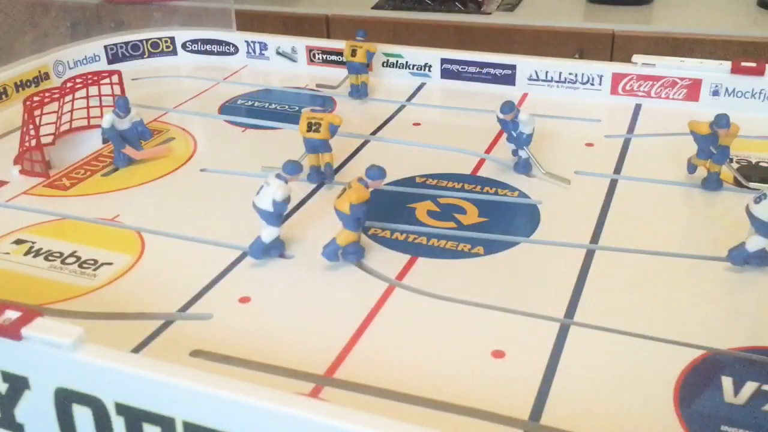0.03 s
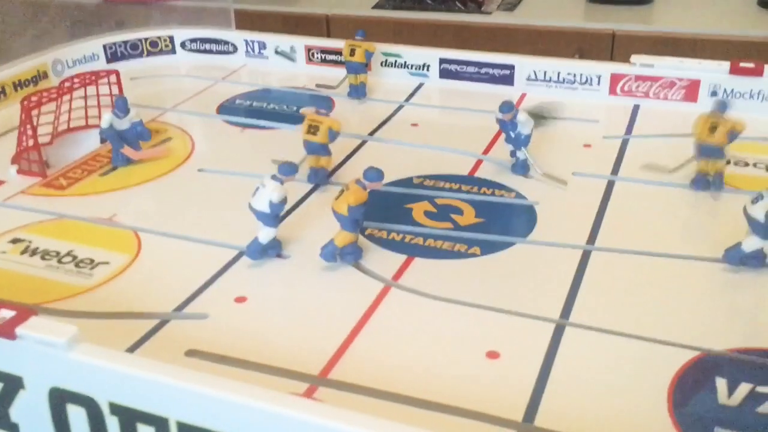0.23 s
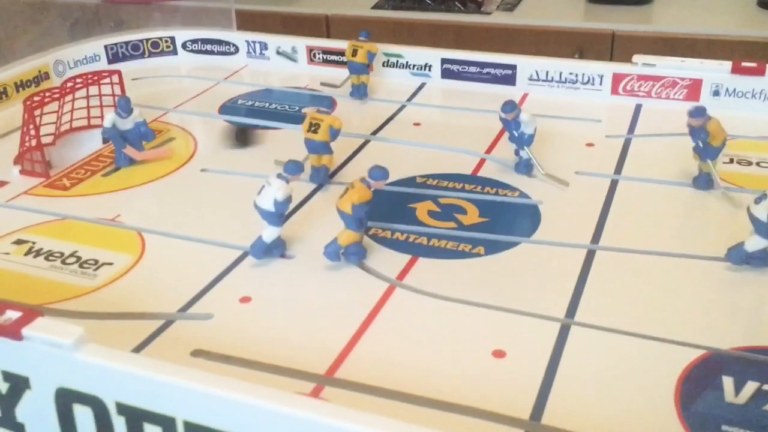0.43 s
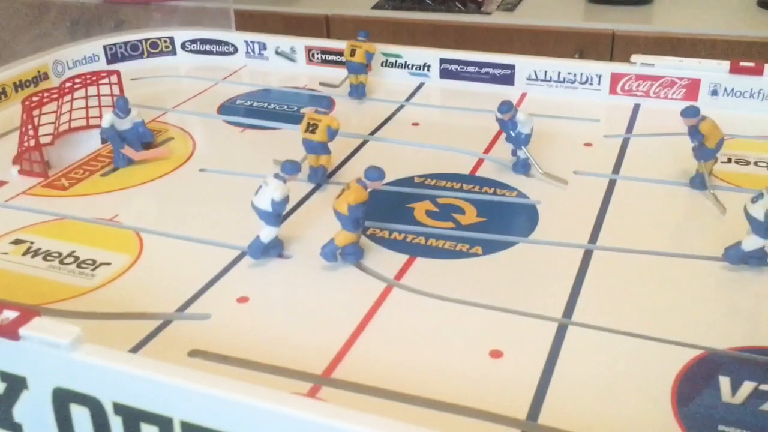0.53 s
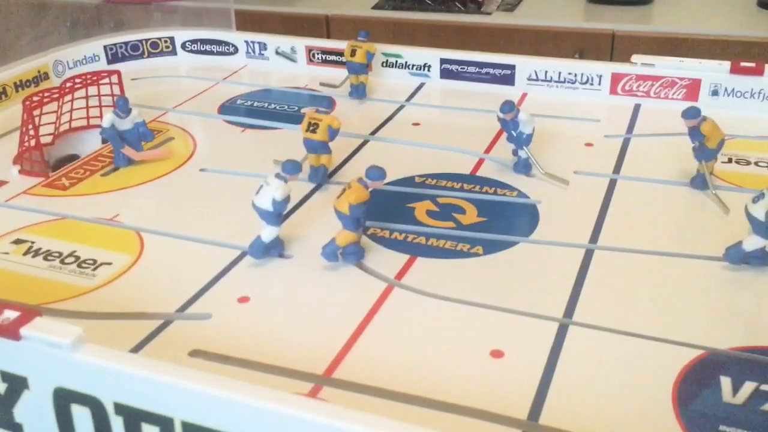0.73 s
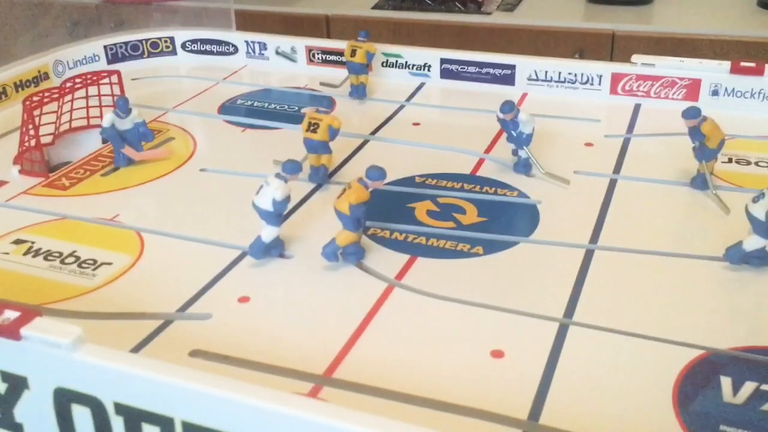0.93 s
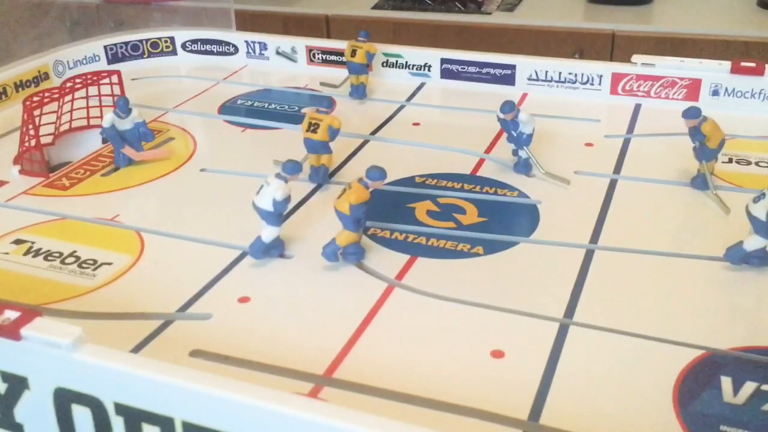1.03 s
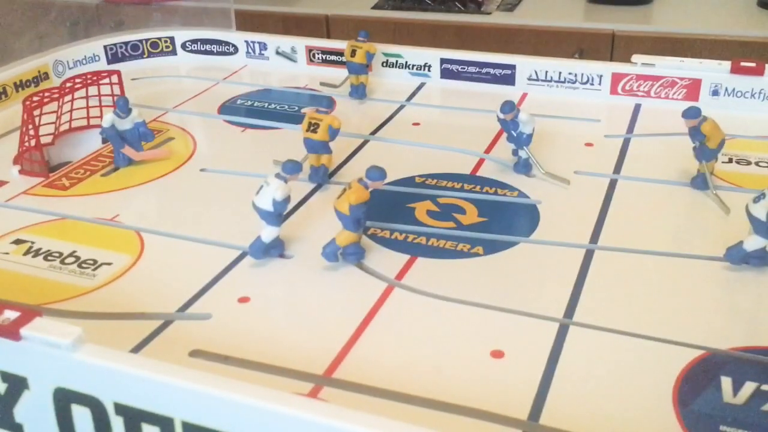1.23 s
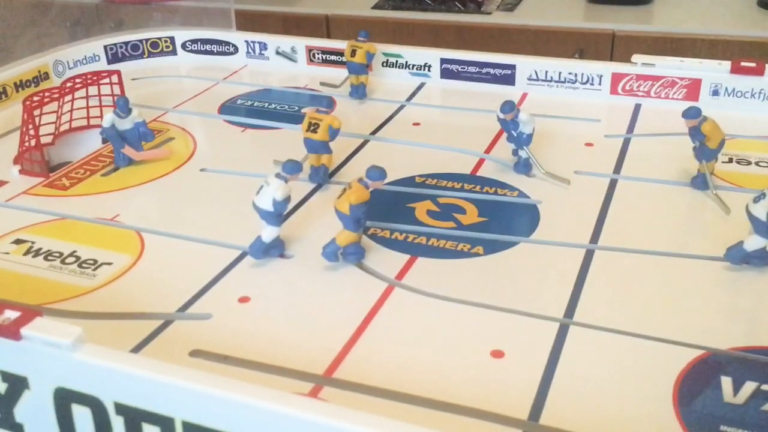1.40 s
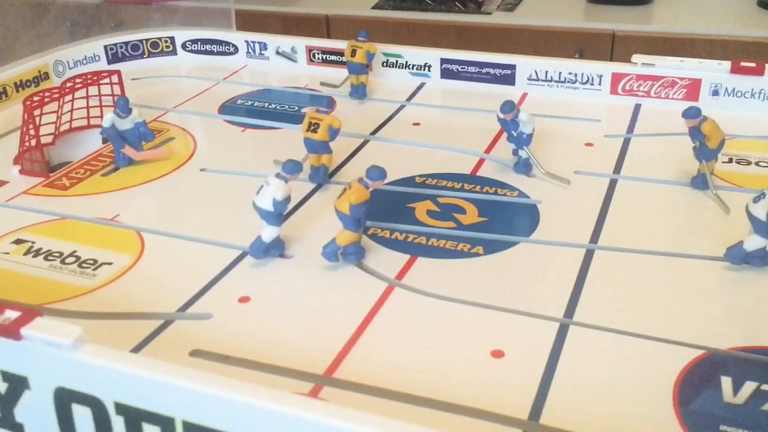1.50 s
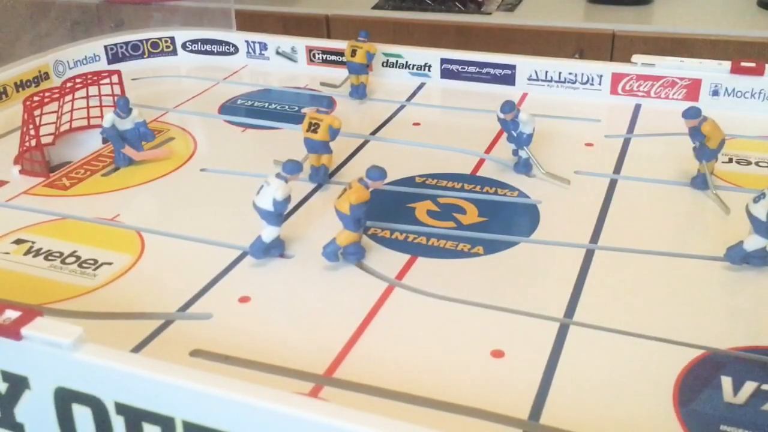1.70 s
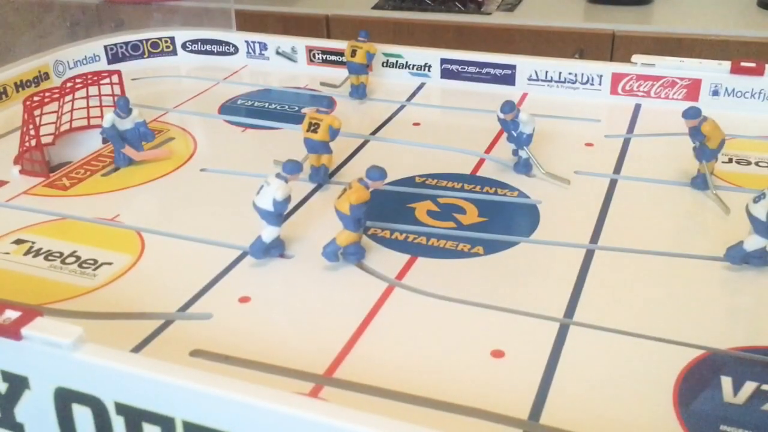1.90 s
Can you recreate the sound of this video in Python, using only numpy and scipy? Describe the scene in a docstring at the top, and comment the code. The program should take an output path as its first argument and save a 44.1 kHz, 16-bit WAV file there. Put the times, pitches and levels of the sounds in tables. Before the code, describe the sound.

A table hockey puck, flicked by a plastic figure, bangs sharply along the boards with a low table thump, slides briefly and rattles to rest in the goal. A control rod then slides softly in the small, quiet room.

```python
"""A table hockey shot

In a small room, a plastic figure flicks the puck with its stick and the table thumps. The puck
bangs along the boards, slides on, clips the goalkeeper and rattles to rest in the goal. Each hit
makes the struck part click and ring. Afterwards a control rod slides softly in its slot."""
import sys
import numpy as np
from scipy import signal
from scipy.fft import rfft, irfft
from scipy.io import wavfile

SR = 44100
rng = np.random.default_rng(int(sys.argv[2]) if len(sys.argv) > 2 else 0)


def inscribe(sig):
    """Save sig as 16-bit PCM at rate SR to the path in sys.argv[1].

    A 1-D sig is mono; a 2-D sig holds one channel per row.
    Samples are clipped to [-1, 1] before scaling.
    """
    pcm = np.round(np.clip(np.atleast_2d(sig).T, -1, 1) * 32767)
    wavfile.write(sys.argv[1], SR, pcm.astype(np.int16))


N = 85995
T = np.arange(N) / SR


def puck_on_boards():
    """The shot and the puck's bounces shake the boards; gives the knocks and their longer ringing."""
    # each hit: (time [s], level [dB], treble boost [dB per octave], ping pitch [Hz], ping level [dB])
    hits = [(.2102, -23, .2, 2740, -18.5), (.2122, -33, 0.5, 1544, -5.5), (.2195, -19, -1.5, 6050, -15.5),
            (.2387, -13, 0, 2900, -18), (.2541, -9, -0.5, 2600, -11.5), (.2699, -2, .5, 1650, 1),
            (.2728, -13, -3, 1500, -6), (.2775, -13.5, -7.5, 2900, -13.5),
            (.2820, -17.5, 2.25, 2050, -12.5), (.2922, -10, 0, 1620, -8.5), (.3300, -13, -1, 1600, -21.5),
            (.3530, -25.5, 3.5, 2000, -38.5), (.3985, -47, 11, 1600, -40), (.4825, -31.5, 1.5, 1600, -34),
            (.5885, -55, -9, 1510, -39)]
    # the boards' many weak tones, blurred together: (frequency [Hz], relative level [dB])
    colour = [(20, -36.5), (60, -24), (120, -18.5), (250, -19.5), (350, -15.5), (600, -14), (1000, -6),
              (1550, 1), (2100, -3), (3100, -4.5), (4200, -15), (5900, -15.5), (7300, -22.5), (9200, -20),
              (10300, -26.5), (12500, -22), (16000, -33.5)]
    # their strongest tones: (pitch [Hz], relative level [dB], fade time [s])
    tones = [(862, -18.5, .45), (999, -12.5, 0.58), (1050, -19, 0.25), (1285, -13, 0.27), (1498, -6, .25),
             (1601, 8.5, 0.41), (1621, 3, 0.3), (1835, -9, 0.42), (1980, -6.5, 0.14), (2275, -7, 0.2),
             (2474, -11.5, 0.12), (2684, -7.5, 0.14), (2917, -9.5, 0.2), (3060, -7, .35)]
    bangs = knocks(hits, colour, click_db=10, body_db=-3.0, body_fade_s=0.092, ping_fade_s=0.01)
    return bangs, ringing(hits, tones, level_db=-18)


def goal_and_rod_knocks():
    """The puck hits keeper and goal, and later the rod clicks; gives the knocks and the goal's ringing."""
    # puck hits: (time [s], level [dB], treble boost [dB per octave], ping pitch [Hz], ping level [dB])
    hits = [(.6430, -32.5, 5.5, 3020, -22), (.6462, -25, -2.9, 1440, -10), (.6610, -33.5, -1.2, 1380, -35),
            (.6780, -35, 2.5, 2000, -32.5), (.7262, -19.5, 0, 2410, -4), (.7274, -25, -0.1, 3690, -8.5),
            (.7312, -33.5, 0, 1970, -34.5), (.7984, -31.5, -8.5, 1940, -5.5), (.8022, -19, 3, 5200, -5.5),
            (.8092, -13.5, 2.5, 6480, -6), (.8135, -23.5, 9.5, 1780, -5), (.8193, -23, -2.5, 2300, -3.5),
            (.8347, -24, -10, 1840, -3), (.8510, -32.5, 0, 1970, -9.5), (.8610, -36, 4, 1820, -12),
            (.8775, -27.5, -2.5, 1900, -7), (.9035, -30.5, 2, 1900, -24), (.9075, -26, -0.5, 2380, -14),
            (.9260, -37, -6, 2000, -29), (.9380, -35, -6, 1900, -46)]
    # the loose rod clicks as it catches: same columns
    rod_clicks = [(1.5085, -53, -1, 2180, -46), (1.5094, -56, -1, 2930, -48)]
    # many weak tones, blurred together: (frequency [Hz], relative level [dB])
    colour = [(40, -40.5), (190, -25.5), (350, -6), (600, -8), (1100, -1), (1850, 0), (2450, -0.5),
              (3000, -6), (3800, -2.5), (4700, -8), (6200, -7), (7500, -17), (8900, -12), (10300, -22.5),
              (12000, -18.5), (16000, -27)]
    # the goal's strongest tones: (pitch [Hz], relative level [dB], fade time [s])
    tones = [(344, -16, 0.79), (932, -12.5, .3), (1143, -10.5, 0.41), (1450, -7.5, .36), (1650, -4.5, 0.32),
             (1738, -18.5, 0.78), (1846, -10.5, 0.57), (2050, -18, 0.33), (2315, -22, .45),
             (2420, -23.5, 0.21), (3570, -15, .38), (5470, -7, 0.19), (12350, -30, 0.29)]
    rattle = knocks(hits + rod_clicks, colour,
                    click_db=12, body_db=-4.5, body_fade_s=0.06, ping_fade_s=0.0068)
    return rattle, ringing(hits, tones, level_db=-15)


def knocks(hits, colour, click_db, body_db, body_fade_s, ping_fade_s):
    """Each knock is a click, a short crack, a noisy ring of the whole part and a ping of the spot hit."""
    crack_fade_s, contact_s = 0.01, 0.00062
    out, t = np.zeros(N), T[:SR // 5]
    fade = np.hypot(decay(t, crack_fade_s), from_db(body_db) * decay(t, body_fade_s))
    rise = 1 - np.exp(-t / contact_s)
    for start, db, treble_boost, ping_hz, ping_db in hits:
        click = from_db(click_db) * (t == 0)
        burst = click + rise * fade * rng.choice([-1., 1.], len(t))
        ping = rise ** 2 * fading_tone(t, ping_hz, ping_db, ping_fade_s)
        add(out, start, from_db(db) * struck(burst, colour, treble_boost) + ping)
    return out


def struck(burst, colour, treble_boost):
    """A struck part passes some frequencies better than others, which colours the burst."""
    size = 2 * len(burst)
    hz = np.fft.rfftfreq(size, 1 / SR)
    octaves = np.log2(np.maximum(hz, 1000) / 2000)  # the treble slope starts at 1000 Hz
    gain = rms_one(from_db(at_hz(colour, hz) + treble_boost * octaves))
    # build the filter so that nothing sounds before the hit ("minimum phase")
    forward_only = np.r_[1, np.full(len(burst) - 1, 2), 1, np.zeros(len(burst) - 1)]
    response = np.exp(rfft(irfft(np.log(gain), size) * forward_only))
    return irfft(rfft(burst, size) * response, size)[:len(burst)]


def ringing(hits, tones, level_db):
    """Every knock sets the part's strongest tones ringing, in a slightly different mix each time."""
    out = np.zeros(N)
    rings = np.array([(-1) ** k * fading_tone(T, *tone) for k, tone in enumerate(tones)])
    for start, db, *_ in hits:
        strengths = from_db(level_db + db + rng.normal(0, 1, len(tones)))
        add(out, start, strengths @ rings)
    return out


def stick_blade():
    """The stick's thin blade rings briefly as it flicks the puck."""
    # the blade's tones: (pitch [Hz], level [dB], fade time [s])
    tones = [(5500, -32, 0.045), (6300, -28, .04), (6537, -35.5, 0.023), (8500, -39, 0.014),
             (11800, -42, .07), (11700, -39.5, .06)]
    out, flick_s = np.zeros(N), 0.2197
    add(out, flick_s, sum(fading_tone(T, *tone) for tone in tones))
    return out


def table_thumps():
    """The shot jolts the table's frame, which swings with low tones that start softly."""
    # each jolt: (time [s], pitch [Hz], level [dB], fade time [s])
    thumps = [(0.244, 52, -47.5, 0.16), (.238, 341, -36.5, 0.98), (0.274, 424, -34.5, 0.31),
              (0.274, 221, -36.5, 0.33), (0.287, 67.4, -40.5, 0.22), (0.316, 154, -29.5, 0.21),
              (.330, 111.5, -29.5, 0.28), (.335, 204, -33.5, .22), (.365, 335, -32.5, 0.27),
              (0.396, 149, -34, 0.17)]
    out, rise_s = np.zeros(N), 0.0027
    rise = 1 - np.exp(-T / rise_s)
    for start, hz, db, fade_s in thumps:
        add(out, start, rise * fading_tone(T, hz, db, fade_s))
    return out


def puck_slide():
    """Tiny bumps drum on the rink as the stick pushes the puck, and again as it glides and slows."""
    # the tone colour of the rink's surface: (frequency [Hz], relative level [dB])
    colour = [(25, -27.5), (70, -8.5), (130, -8), (300, -8), (800, -9.5), (1450, 1.5), (2100, -7.5),
              (3300, -9.5), (4600, -20.5), (6000, -23.5), (8000, -26.5), (16000, -36)]
    bumps_per_s, bump_fade_s = 5700, 0.0084
    glide_start_s, fade_db_per_s = 0.31, 27.5
    bumps = (rng.random(N) < bumps_per_s / SR) * rng.exponential(1, N)
    energy = signal.lfilter([1], [1, -decay(2 / SR, bump_fade_s)], bumps + 1e-18)  # each bump lingers
    scrape = coloured(np.sqrt(energy) * rng.standard_normal(N), colour)
    push = from_db(-54) * gate(0.193, 0.212)
    glide = from_db(-34.5 - fade_db_per_s * (T - glide_start_s)) * gate(glide_start_s, 0.782)
    return (push + glide) * scrape


def rod_slide():
    """The rod hisses in its slot and rumbles through the table."""
    # the rod's stroke: (time [s], hiss level [dB], rumble level [dB])
    stroke = [(1.25, -89, -80), (1.50, -72, -67.5), (1.53, -65.5, -63.5), (1.60, -61, -61.5),
              (1.67, -66, -63), (1.73, -62.5, -65), (1.765, -53, -62.5), (1.80, -58, -62),
              (1.86, -66.5, -61.5), (1.95, -75.5, -61.5)]
    # tone colours of the hiss and the rumble: (frequency [Hz], relative level [dB])
    hiss_colour = [(400, -5.5), (900, -0.5), (2500, -2.5), (4500, -5.5), (6000, -5.5), (9000, -9.5),
                   (11000, -13), (13000, -12), (16000, -17)]
    rumble_colour = [(30, -30.5), (80, -6), (150, 0.5), (210, -8.5), (320, 1), (450, -11), (700, -16),
                     (2000, -41)]
    times, hiss_db, rumble_db = np.transpose(stroke)
    hiss = from_db(np.interp(T, times, hiss_db)) * noise(hiss_colour)
    rumble = from_db(np.interp(T, times, rumble_db)) * noise(rumble_colour)
    return hiss + rumble


def room_echo(sound):
    """Echoes blur into a wash that builds quickly and dies away, soonest in deep bass and high treble."""
    # how long the echo lasts: (frequency [Hz], fade time [s])
    fade_times = [(100, 0.26), (340, 0.71), (700, 0.49), (1700, 0.55), (3700, .5), (9700, .36),
                  (16000, 0.24)]
    # how strong the echo is: (frequency [Hz], relative level [dB])
    levels = [(100, -6), (500, -3.5), (1600, -5.5), (4000, -4.5), (8000, -5.5), (16000, -10)]
    delay_s, build_s = 0.0055, 0.0038
    white_noise, hz = rfft(rng.standard_normal(N)), np.fft.rfftfreq(N, 1 / SR)
    band_edges, out = np.geomspace(60, 17000, 25), 0
    for low, high in zip(band_edges, band_edges[1:]):
        centre = np.sqrt(low * high)
        band_filter = signal.butter(2, [low, high], "band", fs=SR, output="sos")
        energy = signal.sosfilt(band_filter, sound + 1e-18) ** 2
        # smear the energy in time: once for the fade, once for the build-up
        for keep in decay(2 / SR, at_hz(fade_times, centre)), np.exp(-1 / (SR * build_s)):
            energy = signal.lfilter([1 - keep], [1, -keep], energy)
        energy = np.interp(T - delay_s, T, energy, left=0)
        wash = rms_one(irfft(white_noise * (hz >= low) * (hz < high), N))
        out = out + from_db(at_hz(levels, centre)) * np.sqrt(energy) * wash
    return out


def quiet_room():
    """A faint, steady rush with a low hum."""
    # tone colour of the room's air: (frequency [Hz], relative level [dB])
    colour = [(25, -26.5), (50, -12.5), (95, -12), (145, -5), (200, -16.5), (400, -21.5), (800, -20.5),
              (1600, -24), (3000, -31), (6000, -35), (16000, -40.5)]
    air_db, hum_db, hum_hz = -67.5, -74, 145
    return from_db(air_db) * noise(colour) + from_db(hum_db) * np.sin(2 * np.pi * hum_hz * T)


def from_db(db):
    """Turn decibels into a number to multiply by."""
    return 10 ** (np.asarray(db) / 20)


def rms_one(x):
    """Scale a signal to an average power of one."""
    return x / np.sqrt(np.mean(x ** 2) + 1e-20)


def at_hz(points, hz):
    """Read between a table's rows, with octaves evenly spaced."""
    frequencies, values = np.transpose(points)
    return np.interp(np.log(np.maximum(hz, 1)), np.log(frequencies), values)


def decay(t, fade_s):
    """A smooth fall; the fade time is how long it takes to drop by 60 dB."""
    return np.exp(-np.log(1000) * t / fade_s)


def fading_tone(t, hz, db, fade_s):
    """One pure tone that dies away."""
    return from_db(db) * decay(t, fade_s) * np.sin(2 * np.pi * hz * t)


def coloured(x, colour):
    """Give a noise a tone colour (its balance of low and high) and a power of one."""
    hz = np.fft.rfftfreq(len(x), 1 / SR)
    return rms_one(irfft(rfft(x) * from_db(at_hz(colour, hz)), len(x)))


def noise(colour):
    """Steady noise with a tone colour."""
    return coloured(rng.standard_normal(N), colour)


def gate(start_s, end_s):
    """On between two times, with soft edges."""
    return np.clip(np.minimum(T - start_s, end_s - T) / .008, 0, 1)


def add(out, start_s, sound):
    """Mix a sound in at its time."""
    start = int(start_s * SR)
    out[start:start + len(sound)] += sound[:N - start]


def scene():
    """The whole game in one channel; the knocks, the blade and the puck's slide echo in the room."""
    board_knocks, board_ring = puck_on_boards()
    goal_knocks, goal_ring = goal_and_rod_knocks()
    game = board_knocks + goal_knocks + stick_blade() + puck_slide()
    mix = game + board_ring + goal_ring + table_thumps() + rod_slide() + room_echo(game) + quiet_room()
    return mix[None]


def record(dry):
    """Round off the loudest peaks and cut the very highest treble."""
    cutoff_hz = 15900
    rounded = dry / (1 + dry ** 4) ** .25
    return signal.sosfilt(signal.ellip(12, .1, 80, cutoff_hz, fs=SR, output="sos"), rounded)


dry = scene()
out = record(dry)
inscribe(out)
```